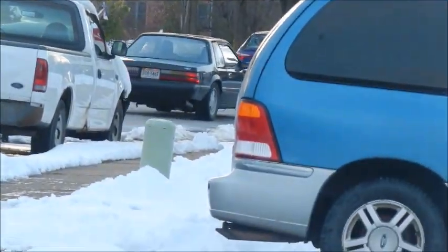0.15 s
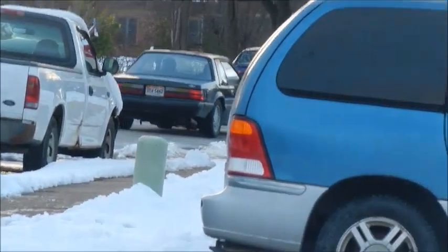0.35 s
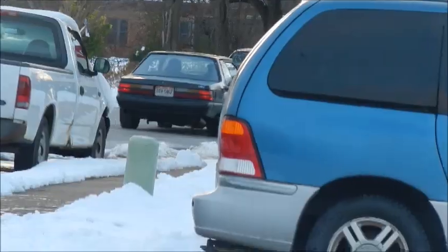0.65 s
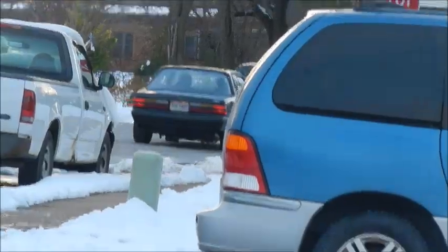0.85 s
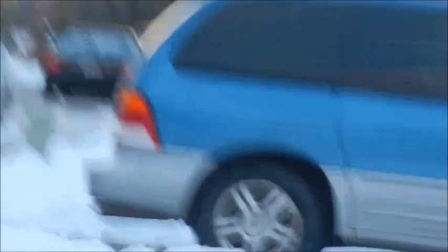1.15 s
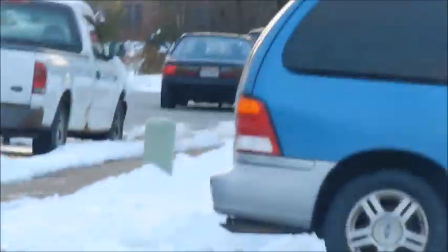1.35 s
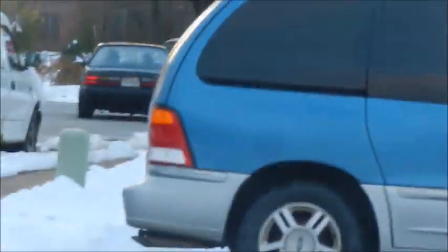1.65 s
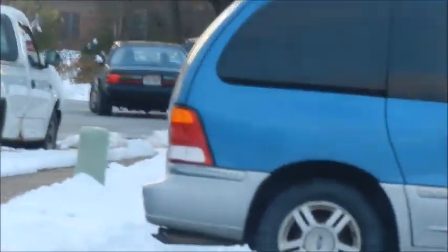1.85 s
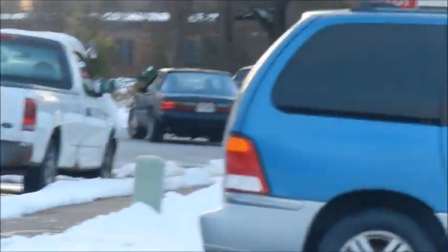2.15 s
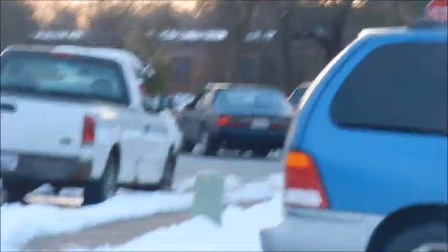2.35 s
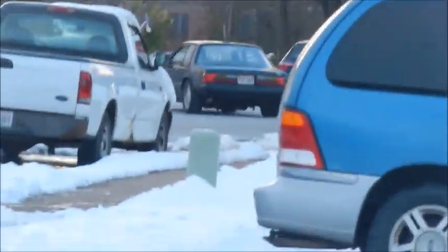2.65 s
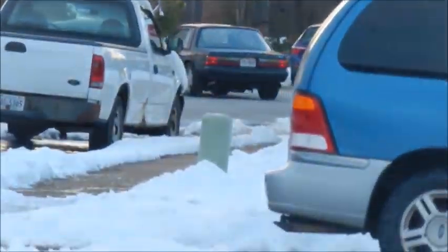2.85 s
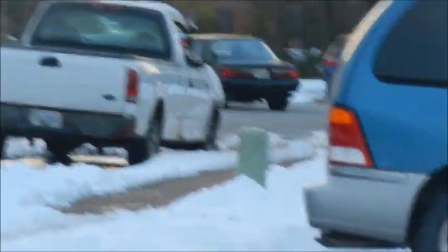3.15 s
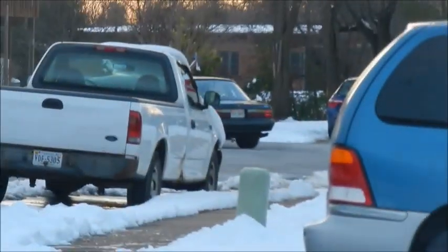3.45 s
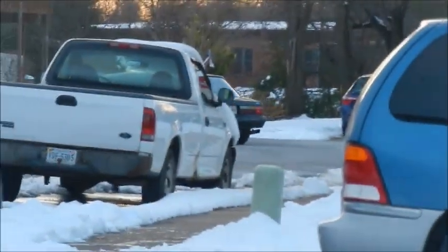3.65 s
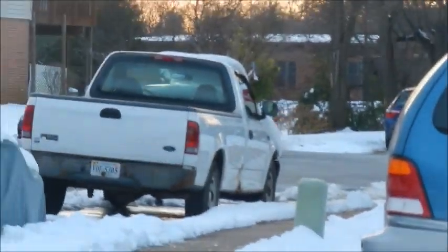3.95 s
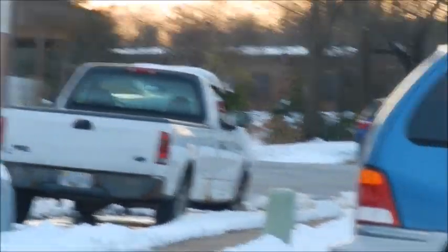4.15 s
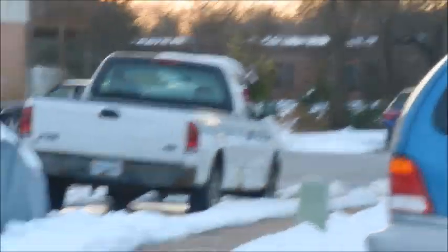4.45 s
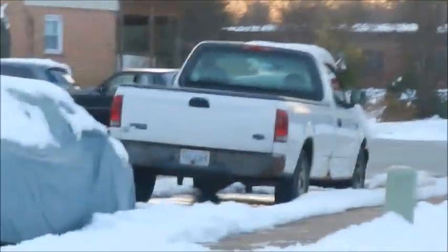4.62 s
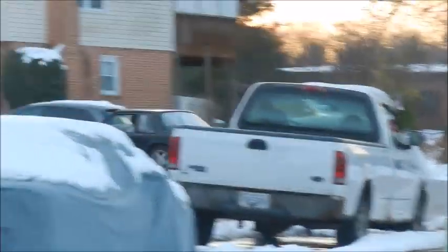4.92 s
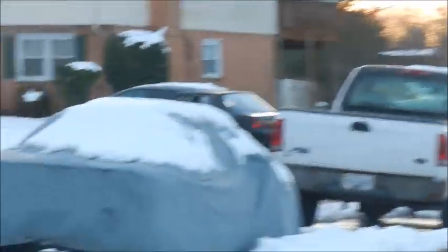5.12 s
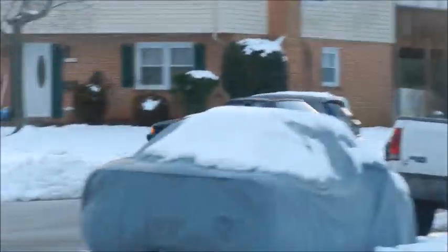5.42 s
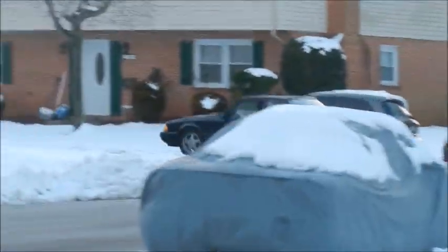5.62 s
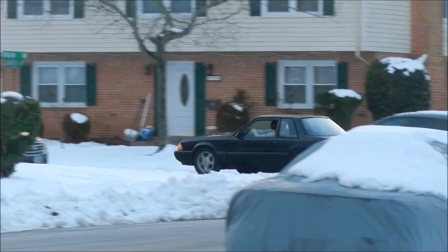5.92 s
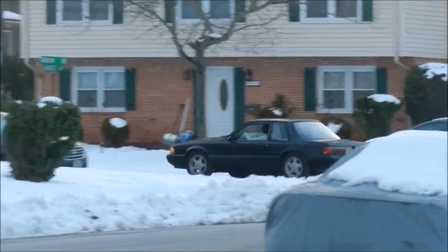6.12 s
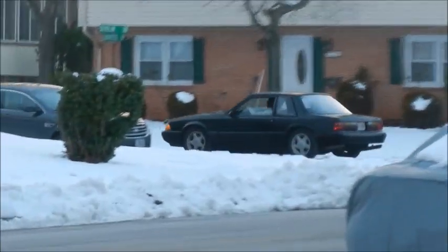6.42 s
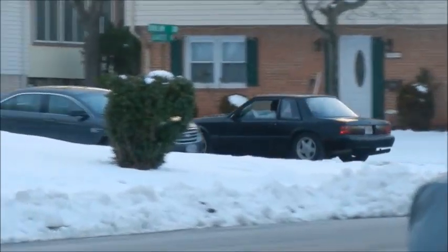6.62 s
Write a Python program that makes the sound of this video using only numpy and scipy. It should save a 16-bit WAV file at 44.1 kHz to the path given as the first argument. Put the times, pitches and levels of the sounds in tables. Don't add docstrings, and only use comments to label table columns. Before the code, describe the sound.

Uneven muscle-car exhaust throbs on a snowy street, climbs steadily into a loud drone, then drops off abruptly, amid glove rustles and small clicks.

```python
import sys
import numpy as np
from scipy import signal
from scipy.fft import rfft, irfft, next_fast_len
from scipy.io import wavfile

SR = 44100
rng = np.random.default_rng(int(sys.argv[2]) if len(sys.argv) > 2 else 0)


def level_to_linear(level):
    exponent = np.asarray(level, float) / 20
    return 10 ** exponent


def waveform_to_disk(signal):
    frames = np.transpose(np.atleast_2d(signal))
    scaled = np.clip(frames, -1, 1) * 32767
    samples = np.round(scaled).astype(np.int16)
    wavfile.write(sys.argv[1], SR, samples)


N = 298907


def in_time(rows):
    s, *columns = np.transpose(rows)
    return [np.interp(np.arange(N) / SR, s, column) for column in columns]


def at_hz(points, hz):
    table_hz, values = np.array(points).T[:2]
    return np.interp(np.log(hz + 1), np.log(table_hz), values)


def step(at_s, edge_s):
    return 0.5 + 0.5 * np.tanh((np.arange(N) / SR - at_s) / edge_s)


def drift(rate, count):
    knots = rng.standard_normal((count, 300))
    place = np.arange(N) / SR * min(rate, 40)
    return np.array([np.interp(place, np.arange(300), row) for row in knots])


def coloured(x, spectrum):
    size = next_fast_len(N + SR // 2)
    gain = level_to_linear(at_hz(spectrum, np.fft.rfftfreq(size, 1 / SR)))
    return irfft(rfft(x, size) * gain, size)[..., :N]


def noise(spectrum):
    pair = coloured(rng.standard_normal((2, N)), spectrum)
    return pair / pair.std()


def multiples(table, cycle, waver_db, slip, rate):
    waver = drift(rate, count=2 * len(table)).astype(np.float32)
    start = rng.random(len(table))
    total = 0
    for k, (multiple, level_db) in enumerate(table):
        turns = (multiple * cycle + start[k]) % 1
        phase = (2 * np.pi * turns).astype(np.float32) + slip * waver[2 * k + 1]
        total = total + level_to_linear(level_db + waver_db * waver[2 * k]) * np.sin(phase)
    return total


# start_s, firing_hz, firing_note_db, effort_db
DRIVE = [(0, 88.5, -44, 0), (.3, 85.3, -48, 0), (.7, 81, -51.5, -0.5), (1.55, 73.5, -46, -1),
         (1.8, 76, -39.5, 0.5), (2.05, 74, -40.5, -1), (2.5, 81.3, -38.5, 0.5), (3.4, 94.3, -37, 0.5),
         (3.8, 98.3, -38, 3), (4.6, 113.7, -35.5, 5.5), (4.85, 119.8, -32, 4), (5.3, 128.8, -24.5, 6.5),
         (5.85, 140.8, -25, 5), (6.28, 147.7, -27.5, 6.5), (6.4, 143.5, -30, 6), (6.6, 130, -28.5, 0.5),
         (6.68, 123.5, -45.5, 3), (6.74, 121, -35, 2.5)]


def engine():
    firing_hz, note_db, effort_db = in_time(DRIVE)
    return firing_hz, note_db, effort_db, np.cumsum(firing_hz) / SR


def loping():
    return 1 - step(at_s=2, edge_s=0.3)


def lifted():
    return step(at_s=6.36, edge_s=0.067)


CLEAN_MULTIPLES = [8, 10, 14, 16, 22, 24, 32, 48]
# multiple, resonance_hz, width_hz, crest_db
CROSSINGS = [(10, 121.3, 10.6, -40.5), (10, 138, 7.6, -32), (10, 160, 7.6, -54), (14, 133, 8.2, -47),
             (14, 247, 11, -45), (16, 264, 9.8, -45), (16, 285.7, 11.7, -49), (22, 372, 8.3, -53),
             (22, 392, 12.1, -53), (24, 377, 11, -47.5), (24, 409, 33, -54.5), (32, 505, 17, -57),
             (48, 765, 18, -59)]


def neighbours(firing_hz):
    lifted_db = -10.5 * lifted()
    levels = []
    for multiple in CLEAN_MULTIPLES[1:]:
        swell = level_to_linear(-80)
        for crossing, hz, width, crest_db in CROSSINGS:
            if round(crossing) == multiple:
                swell = swell + level_to_linear(crest_db) * np.exp(-((multiple * firing_hz / 8 - hz) / width) ** 2)
        levels.append(lifted_db + 20 * np.log10(swell))
    return levels


def clean_lines(firing_hz, note_db, cycle):
    lines = list(zip(CLEAN_MULTIPLES, [note_db, *neighbours(firing_hz)]))
    upper = multiples(lines[2:], cycle, waver_db=1.5, slip=0.18, rate=18)
    lower = multiples(lines[:2], cycle, waver_db=0.9 + 2 * loping(), slip=0.07, rate=11)
    return np.sqrt(2) * (upper + lower)


# crest_s, crest_db, pitch_hz
BOOMS = [(0.177, -36, 128), (0.265, -49, 133), (.439, -37, 117), (0.563, -32, 128), (.758, -34, 129),
         (0.887, -32.5, 121), (1.07, -34.5, 134), (1.264, -34, 116), (1.401, -40.5, 138.5),
         (1.472, -33, 122), (1.611, -37.5, 120.9), (1.685, -37, 124), (1.79, -37.5, 121.2),
         (1.893, -37.5, 127), (2.002, -37.5, 119), (2.112, -35.5, 113)]


def booms():
    near = slice(0, int(2.4 * SR))
    crest_s, crest_db, hz = np.array(BOOMS).T[:, :, None]
    since = np.arange(N)[near] / SR - crest_s
    swell = level_to_linear(crest_db) * np.exp(-(since / 0.022) ** 2)
    out = np.zeros(N)
    out[near] = np.sum(swell * np.sin(2 * np.pi * hz * since), axis=0)
    return out


# multiple, level_db
RUMBLE = [(3, -4), (4, -7.5), (5, -8.5), (6, 0.5), (7, -3)]
# firing_hz, level_db
RUMBLE_BY_SPEED = [(75, -49.5), (88, -56), (98, -57), (104, -49.5), (119, -43), (127, -45.5), (133, -51.5),
                   (147, -51.5)]
# multiple, level_db
BURBLE = [(9, -8), (11, 0), (12, -4), (13, -5)]
# firing_hz, level_db
BURBLE_BY_SPEED = [(75, -51.5), (88, -46), (110, -51.5), (121, -33.5), (128, -46), (140, -54)]
# pitch_hz, level_db
PIPE = [(25, -16), (48, -15), (65, 6.5), (90, -5.5), (125, 3), (145, 4.5), (160, -16.5), (205, -32),
        (300, -28)]


def muffled(firing_hz, firings):
    cycle = firings / 8
    rumble_db = at_hz(RUMBLE_BY_SPEED, firing_hz) + 3 * lifted()
    rumble = level_to_linear(rumble_db) * multiples(RUMBLE, cycle, waver_db=2.5, slip=0.8, rate=8)
    burble_db = at_hz(BURBLE_BY_SPEED, firing_hz)
    burble = level_to_linear(burble_db) * multiples(BURBLE, cycle, waver_db=3.0, slip=0.12, rate=4.5)
    fires = np.diff(np.floor(firings), prepend=0)
    burns = fires * rng.standard_normal(N) * SR / 200
    burns = signal.sosfilt(signal.butter(2, 170, fs=SR, output="sos"), burns)
    return coloured(rumble + burble + level_to_linear(-53 + loping()) * burns, PIPE)


# multiple, level_db
RASP = [(15, -1.5), (17, -8), (18, -10.5), (20, -7.5), (21, -3), (23, 2.5), (25, 0), (26, -4), (27, -10.5),
        (28, -12), (30, 1.5), (31, -2.5), (32, -4), (47, -6), (48, -4.5)]
# pitch_hz, level_db
TAILPIPE = [(150, -22), (210, -15), (250, 0), (300, -16), (345, -13.5), (378, -2.5), (405, -12),
            (430, -4.5), (465, -21), (510, -5.5), (560, -28), (720, -16), (765, -7), (830, -24.5)]


def rasp(effort_db, cycle):
    lines = multiples(RASP, cycle, waver_db=2.0, slip=0.25, rate=6)
    return coloured(level_to_linear(-60 + 1.78 * effort_db) * lines, TAILPIPE)


def exhaust(firing_hz, note_db, effort_db, firings):
    cycle = firings / 8
    lines = clean_lines(firing_hz, note_db, cycle)
    return lines + booms() + muffled(firing_hz, firings) + rasp(effort_db, cycle)


# pitch_hz, level_db (per Hz)
ROAR = [(150, -22), (250, -4.5), (320, -9), (380, -6), (460, -10.5), (510, -8), (580, -15), (760, -10),
        (950, -14.5), (1300, -18), (1900, -22), (6000, -45)]


def engine_roar(effort_db, puffs):
    level_db = -52.5 + effort_db + 0.6 * drift(7, count=1)
    return level_to_linear(level_db) * (1 + 0.15 * puffs) * noise(ROAR)


# pitch_hz, level_db (per Hz)
HISS = [(1250, -30), (1420, 0), (1550, -3), (1740, 0), (1900, -30)]


def tailpipe_hiss(puffs):
    idle_db, load_db, edge_s = -82, -64, 0.073
    loaded = step(2.115, edge_s) - step(6.7, edge_s)
    surge = np.exp(-((np.arange(N) / SR - 4.79) / 0.32) ** 2)
    level_db = idle_db + (load_db - idle_db) * loaded + 7.5 * surge
    return level_to_linear(level_db + 2.4 * drift(14, count=1)) * (1 + 0.14 * puffs) * noise(HISS)


# pitch_hz, level_db (per Hz)
RUSTLE = [(1500, 2), (3000, 3), (5000, -2), (7000, -4), (9000, -4), (11900, -1), (14000, -4.5), (15800, -6)]
# start_s, length_s, level_db, dullness_db
STROKES = [
    (1.07, 0.082, -61.5, -9),
    (1.168, 0.04, -54.5, -8),
    (1.21, 0.078, -59.5, -11),
    (1.843, 0.046, -67, -10),
    (2.37, .16, -70.5, -15),
    (4.05, 0.15, -74, 1),
    (4.783, .05, -67.5, 0),
    (5.16, .05, -69.5, -2),
    (5.449, 0.033, -66, -2),
    (6.288, 0.38, -59.5, -2.5),
]


def gloves():
    full = noise(RUSTLE)
    body = signal.sosfilt(signal.butter(2, 8500, fs=SR, output="sos"), full)
    flicker = drift(40, count=1)
    grain = np.repeat(rng.standard_normal(N // 128 + 1), 128)[:N]
    grip_db = -66.5 - 3 * step(4.5, 0.089)
    top_gain, body_gain = level_to_linear(grip_db), level_to_linear(grip_db + 0.5)
    edge_s = 0.012
    for start, length, level_db, dull_db in STROKES:
        stroke = (step(start, edge_s) - step(start + length, edge_s)) * level_to_linear(level_db + 2 * grain)
        top_gain = top_gain + stroke
        body_gain = body_gain + stroke * level_to_linear(dull_db)
    return level_to_linear(2.2 + 1.2 * flicker) * (top_gain * (full - body) + body_gain * body)


def ring(clicks, hz, t60):
    r, w = level_to_linear(-60 / (t60 * SR)), 2 * np.pi * hz / SR
    return signal.lfilter([0, np.sin(w)], [1, -2 * r * np.cos(w), r * r], clicks)


# start_s, peak_db, pitch_hz, thud_db, crack_db
TICKS = [(1.046, -43, 1995, -10, 2), (1.091, -40.5, 2828, 3, -4), (1.111, -43, 2250, -6, 4),
         (1.124, -35, 2250, -16, -5), (1.159, -41.5, 2260, -9, 0), (1.2666, -32.5, 2270, 3, 2),
         (1.496, -31, 2900, -11.5, 2.5), (4.036, -39.5, 1546, -11.5, -17), (4.481, -45, 2800, -10, 4),
         (4.538, -34.5, 2382, -11, -14), (4.796, -45, 2595, -7, 1), (5.479, -43.5, 2640, -10, -5.5),
         (5.691, -32, 2900, -12, -8.5), (6.325, -45, 1846, -7, -4)]
# pitch_hz, level_db, t60_s
CASING = [(885, -10, 0.011), (1400, -8.5, 0.014), (4740, -3, 0.008), (7200, -1, 0.0024),
          (9600, -21, 0.0019)]


def ticks():
    out = np.zeros((2, N))
    spread_db = rng.normal(0, 2, (len(TICKS), len(CASING)))
    lead = 1000
    click = np.eye(1, 3000, lead)[0]
    t = (np.arange(3000) - lead) / SR
    noises = rng.standard_normal((len(TICKS), 2, 2, len(t)))
    arrivals = np.array([[1], [0.3]])
    top = signal.butter(6, 13500, fs=SR, output="sos")
    for (s, peak_db, hz, thud_db, crack_db), own, (sharp, soft) in zip(TICKS, spread_db, noises):
        rings = ring(click, hz, 0.0061) + level_to_linear(thud_db) * ring(click, 450, 0.008)
        for (mode_hz, mode_db, t60), own_db in zip(CASING, own):
            rings += level_to_linear(mode_db + crack_db + own_db - 7.0) * ring(click, mode_hz, t60)
        snap = 1.8 * click * arrivals
        crack = level_to_linear(crack_db - 6) * (sharp + snap) * (t >= 0) * level_to_linear(-60 * abs(t) / 0.0089)
        band = signal.butter(2, [hz * 0.82, hz * 1.4], "band", fs=SR, output="sos")
        fade = np.where(t < 0, -t / 0.098, t / 0.11)
        halo = signal.sosfilt(band, soft) * level_to_linear(-10 - 60 * fade)
        tick = signal.sosfilt(top, rings * arrivals + crack + halo)
        at = round(s * SR) - lead
        out[:, at:at + len(t)] += level_to_linear(peak_db + 1.5) * tick
    return out


# pitch_hz, level_db (per Hz)
HUSH = [(12, -55.5), (20, -19), (63, -6.5), (122, -3.5), (149, -6.5), (186, -12), (793, -27), (1240, -43),
        (1460, -27), (1730, -29.5), (7370, -42.5), (11800, -63), (15600, -54)]


def street_hush():
    return level_to_linear(-50.5) * noise(HUSH)


# pitch_hz, level_db
LEFT_DB = [(30, -9.3), (120, -9.8), (250, -9.5), (500, -9), (1000, -7.6), (2000, -4.6), (4000, -2.2),
           (8000, .4), (13000, 4.2)]
# pitch_hz, likeness (0-1)
LIKENESS = [(30, .9), (60, .98), (130, .995), (290, .9), (640, .82), (1400, .7), (3100, .55), (6800, .48),
            (15000, .3)]
# pitch_hz, turn_rad
TURN = [(130, 3.1), (400, 3.02), (800, 2.94), (1600, 2.78), (3500, 2.58), (7000, 2.5), (12000, 2.2)]


def microphones(sound, other):
    size = next_fast_len(N + 512)
    hz = np.fft.rfftfreq(size, 1 / SR)
    alike = np.clip(at_hz(LIKENESS, hz), 0, 1)
    left_gain = level_to_linear(at_hz(LEFT_DB, hz))
    turn = np.exp(1j * at_hz(TURN, hz))
    right = rfft(sound, size)
    left = left_gain * (alike * turn * right + np.sqrt(1 - alike ** 2) * rfft(other, size))
    middle = np.sqrt(1 + left_gain ** 2 + 2 * left_gain * alike * turn.real) / 2
    return irfft(np.array([left, right]) / middle, size)[:, :N]


def scene():
    firing_hz, note_db, effort_db, firings = engine()
    pipe = exhaust(firing_hz, note_db, effort_db, firings)
    puffs = np.sin(2 * np.pi * firings)
    car = engine_roar(effort_db, puffs) + tailpipe_hiss(puffs)
    sound, other = car + gloves() + ticks() + street_hush()
    late_pipe = np.roll(pipe, 3100)
    return microphones(sound + pipe, other + late_pipe)


def low_pass(x):
    return signal.sosfilt(signal.butter(12, 15800, fs=SR, output="sos"), x)


def record(dry):
    top_cut = signal.cheby2(14, 60, 15780 * 1.035, fs=SR, output="sos")
    mix = signal.sosfilt(top_cut, dry)
    return low_pass(mix)


dry = scene()
out = record(dry)
waveform_to_disk(out)
```